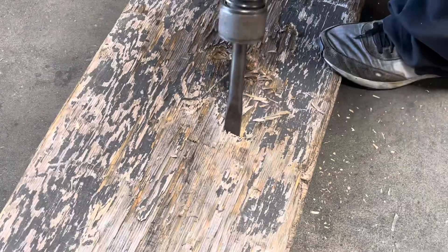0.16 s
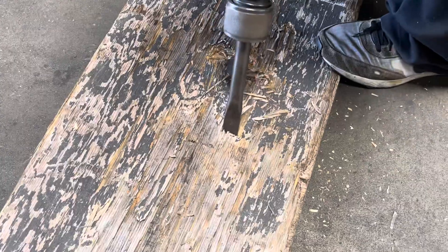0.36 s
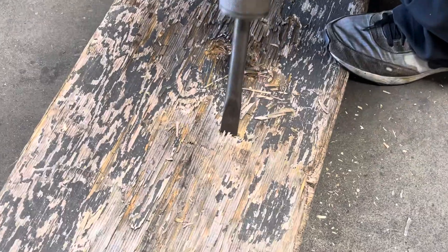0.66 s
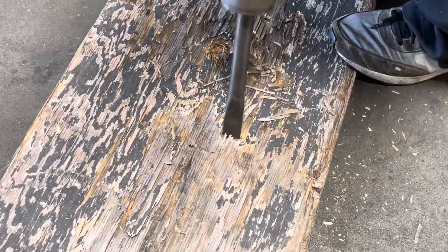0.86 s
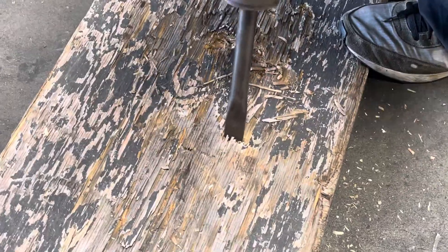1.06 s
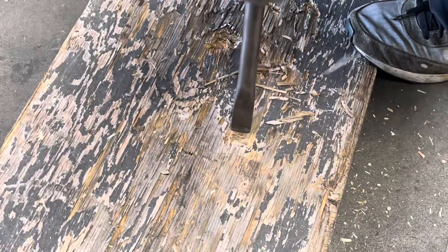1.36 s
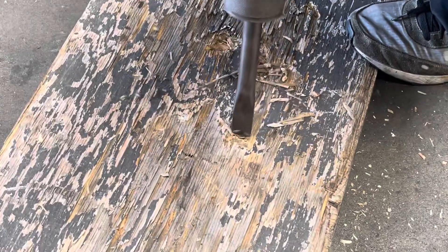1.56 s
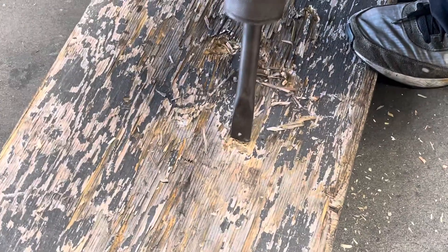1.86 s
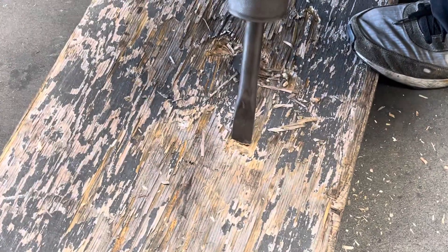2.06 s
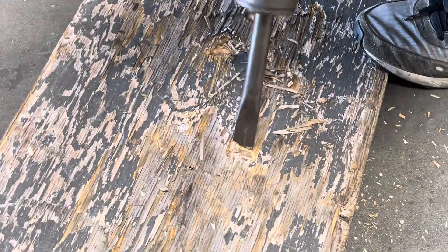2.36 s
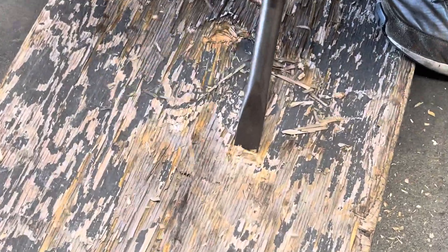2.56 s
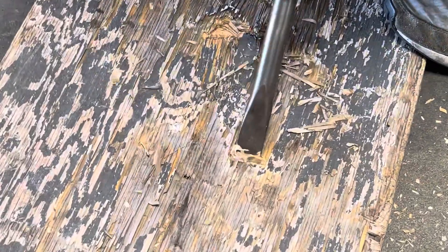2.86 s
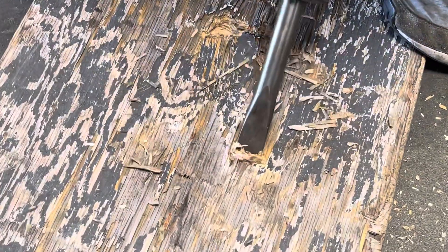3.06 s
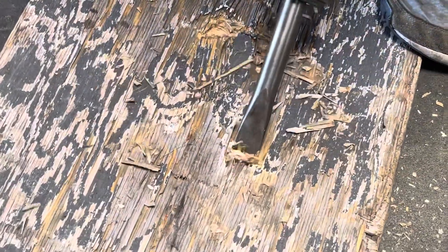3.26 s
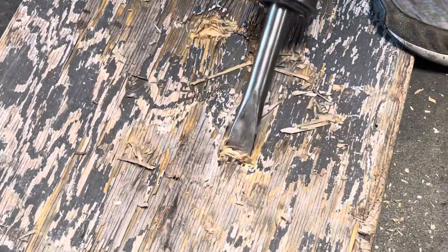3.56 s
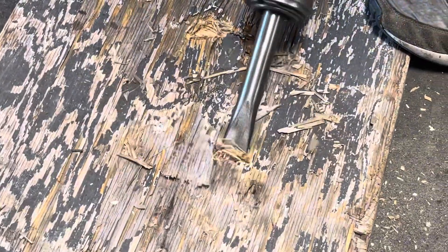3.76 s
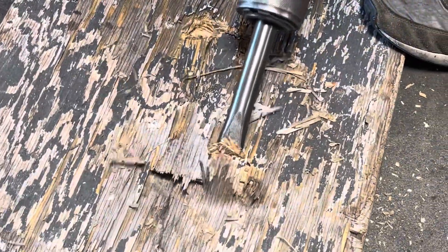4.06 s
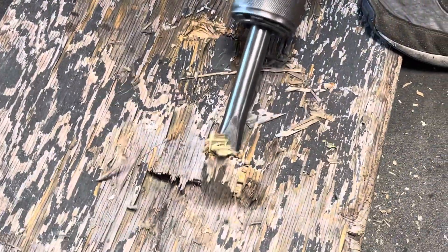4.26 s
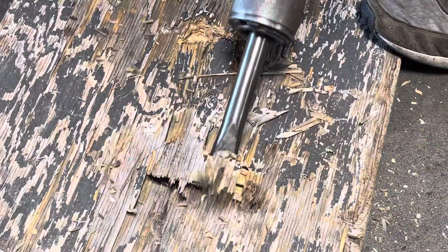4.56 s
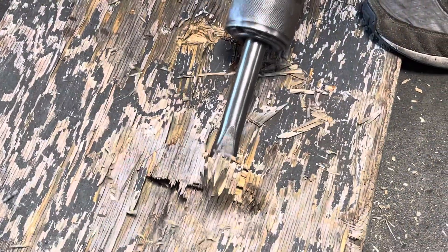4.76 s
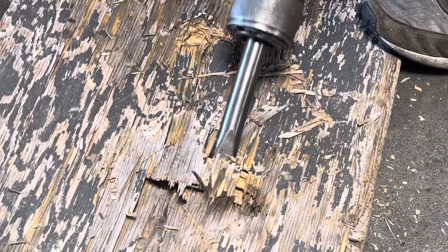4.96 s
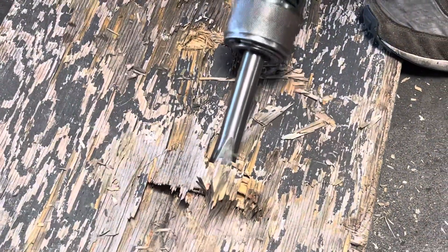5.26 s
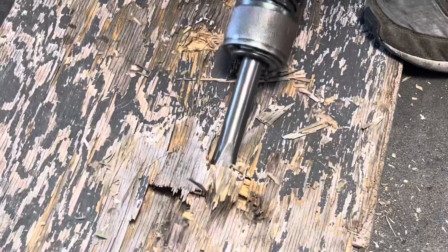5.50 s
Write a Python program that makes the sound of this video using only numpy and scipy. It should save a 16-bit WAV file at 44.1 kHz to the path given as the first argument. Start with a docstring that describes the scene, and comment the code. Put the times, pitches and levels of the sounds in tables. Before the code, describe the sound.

A pneumatic hammer hammers a steel chisel into a thick wooden board for about 5.6 seconds, close and dry in a workshop. Some 22 blows a second, slightly irregular, fuse into a hard buzzing rattle, yet each stroke remains distinct: a faint swell, bright steel snap, woody crack, knock around 500 to 650 hertz dipping in pitch, and short thud with a brief board tail of under a tenth of a second. The first blow is weak. Around 0.5 seconds the bit bounces free, rattling and ringing with a few weakened strokes; sharp, clanky blows stand out near 1.0. From 1.5 the knocks are fuller, with mixed bright and glancing hits. Past 3.5 to 3.9 the edge sinks in and the wood sounds deeper and more splintery. Another loose metallic rattle comes near 5.2, then hammering continues to the end. Quiet patchy air hiss lies underneath; the image is nearly central.

```python
"""In a workshop, a pneumatic hammer drives a steel chisel into a thick wooden board, some 22 blows a second.
Each blow sums filtered impulses and noise puffs: a steel snap, a crack of the edge, a knock of the board's
modes that sinks in pitch by dispersion, a thud and an after-sound; a faint noise swells into it. The bit rings
on as shaped noise when it bounces free, and rattles in its retainer. Steady noise in patches is the air and
the workshop, heard close by at two microphone ports."""
import sys
import numpy as np
from scipy import signal
from scipy.fft import rfft, irfft, next_fast_len
from scipy.io import wavfile
from scipy.ndimage import uniform_filter1d, minimum_filter1d

SR = 44100
rng = np.random.default_rng(int(sys.argv[2]) if len(sys.argv) > 2 else 0)


def waveform_to_disk(signal):
    """Save audio, clipped to [-1, 1], as 16-bit WAV at the path in sys.argv[1]."""
    frames = np.transpose(np.atleast_2d(signal))
    scaled = np.clip(frames, -1, 1) * 32767
    samples = np.round(scaled).astype(np.int16)
    wavfile.write(sys.argv[1], SR, samples)


N = 248283

# one blow is a row of SIZE samples, struck at sample ZERO
SIZE, ZERO = 4096, 1024
T = (np.arange(SIZE) - ZERO) / SR  # seconds from the strike
IMPULSE = (T == 0) * 1.0


def hammer():
    """Superposition: the blows add up in time, and a stray copy is smeared over many short unlike paths."""
    moments = blow_times()
    rows = blows(moments)
    paths = unit(burst(0., 0.00049)) * np.sqrt(SIZE)
    paths_from_zero = np.roll(paths, -ZERO, axis=1)
    stray_rows = irfft(rfft(rows) * rfft(paths_from_zero) / np.sqrt(SIZE), SIZE)
    out = np.zeros((2, N + 2 * SIZE))
    for moment, row, stray in zip(moments, rows, stray_rows):
        first = round(moment * SR)
        out[:, first:first + SIZE] += [row, stray]
    return out[:, ZERO:ZERO + N]


# pace of the piston, blows falling evenly between marks: start_s [s], blows_so_far [count]
PACE = [(0.0212, 0), (0.2475, 5), (0.4303, 9), (0.525, 11), (0.5775, 12), (0.7729, 16), (0.8234, 17),
        (1.0187, 21), (1.0696, 22), (1.1166, 23), (1.3113, 27), (1.4148, 29), (1.4625, 30), (1.5977, 33),
        (2.5951, 55), (3.3686, 72), (3.5522, 76), (3.5969, 77), (3.9623, 85), (4.1987, 90), (4.4317, 95),
        (4.6135, 99), (5.0257, 108), (5.21, 112), (5.2533, 113), (5.6202, 121)]
COUNT = int(PACE[-1][1]) + 1
JITTER_S = .0002


def blow_times():
    """Near-periodic excitation: the moments follow the pace with a small random jitter."""
    start_s, struck = np.transpose(PACE)
    return np.interp(np.arange(COUNT), struck, start_s) + JITTER_S * rng.standard_normal(COUNT)


# how the board answers as the edge digs in, usual values:
# start_s [s], knock_db [dB], knock_hz [Hz], upper_knock_db [dB], thud_db [dB], after_sound_db [dB]
BITE = [(0, -18, 543, -11, -31, -37), (.43, -20.5, 510, -13, -26.5, -40),
        (.56, -32.5, 583, -23, -36.5, -44), (.9, -26.5, 646, -27, -38, -39),
        (1.36, -32, 620, -13.5, -34.5, -36), (1.5, -11.5, 547, -23, -30, -31),
        (1.6, -22, 556, -16, -31, -27.5), (1.95, -17.5, 593, -10, -30.5, -27),
        (2.2, -18, 538, -11.5, -31.5, -34), (2.6, -19, 580, -8.5, -31.5, -30.5),
        (2.75, -15.5, 587, -8, -30.5, -39), (2.95, -22.5, 573, -36, -27, -31.5),
        (3.15, -17.5, 560, -10.5, -28.5, -43), (3.3, -19.5, 560, -24, -27.5, -36.5),
        (3.7, -18, 618, -18.5, -31, -34), (4.0, -21.5, 610, -24, -29.5, -32),
        (4.35, -27.5, 610, -27, -27, -31), (4.55, -21, 610, -10, -26, -33),
        (4.8, -28.5, 610, -29, -29.5, -31), (5.05, -18.5, 630, -22, -28.5, -34.5),
        (5.2, -17, 600, -30, -27.5, -33), (5.63, -15.5, 622, -16, -28, -32.5)]
# how loosely the bit sits in its retainer, usual values: start_s [s], shank_db [dB], bit_ring_db [dB]
PLAY = [(0, -19.5, -44), (.45, -21, -51), (.9, -20, -39), (1.3, -25, -42), (1.55, -23, -45),
        (2.0, -22.5, -48), (2.2, -14.5, -48), (2.5, -26, -38), (2.7, -22, -54), (2.9, -19, -41),
        (3.5, -11.5, -44), (3.65, -19, -49), (4.0, -19, -45), (4.3, -19, -40), (4.8, -19, -46),
        (5.0, -14.5, -46), (5.3, -18, -40), (5.63, -18.5, -44)]
# blows that stand out (glancing, bouncing free or biting deep); each row sets the blow nearest its time:
# start_s [s], crack_db [dB], snap_db [dB], shank_db [dB], knock_db [dB], upper_knock_db [dB], bit_ring_db [dB]
STANDOUT = [(0.02, -49, -54, -32, -18, -14.5, -52), (0.07, -11, -15.5, -15, -28, -9, -47),
            (0.48, -16.5, -35, -5, -27, -37, -33), (0.52, -38, -40, -14, -43, -27, -37.5),
            (0.58, -20, -28, -31, -32, -18, -49), (0.68, -27.5, -22.5, -18.5, -48, -40, -45),
            (0.97, -11, -13.5, -9, -33, -24, -46), (1.02, -10, -10.5, -7, -28, -39, -37),
            (1.07, -13, -20, -11, -46, -33, -38), (1.12, -26.5, -23.5, -23, -35, -26, -47),
            (1.36, -19, -25, -24.5, -30, -15, -37), (1.46, -12, -12.5, -21, -22, -10, -45),
            (1.55, -19, -23, -26, -13.5, -7.5, -50), (1.6, -19, -19.5, -18, -12, -8, -48),
            (1.78, -17, -21.5, -23.5, -13, -10, -41), (1.87, -17, -20, -22.5, -15.5, -9.5, -53),
            (2.01, -15.5, -13.5, -14.5, -19, -34, -40), (2.05, -18.5, -19, -49, -20, -12.5, -47),
            (2.6, -15, -19.5, -19.5, -29, -18, -57), (2.64, -16, -20, -24, -23, -23, -48),
            (2.78, -13, -13, -10, -15, -8.5, -42), (2.87, -16.5, -17.5, -15, -22, -34, -39),
            (3.28, -18.5, -17.5, -22, -28, -18, -53), (3.41, -13.5, -17, -15, -25, -20, -41),
            (3.51, -14, -13, -15, -27, -10, -40), (3.55, -16, -17.5, -13, -15, -14, -50),
            (3.78, -12.5, -15.5, -28, -18, -14, -42), (4.15, -14, -16.5, -8.5, -22.5, -22, -37),
            (4.89, -17, -19, -18, -16.5, -23, -40), (4.98, -15.5, -15.5, -15, -21, -32, -45),
            (5.12, -13.5, -16, -13, -43, -15, -37), (5.16, -17, -18, -11.5, -12.5, -11.5, -38.5),
            (5.21, -23, -20, -20, -16, -41, -29.5), (5.48, -23.5, -24, -18, -16, -16, -63)]
# scale of the chance change from blow to blow: one entry per part [dB]
SCATTER_DB = dict(crack=2, snap=1.6, shank=3, knock=3, upper=4, thud=1.5, ring=6.5, after=2)
CRACK_DB, SNAP_DB = -15.5, -18.5  # of a usual blow
KNOCK_SCATTER_HZ = 20


def strengths(moments):
    """Variable excitation: the level of each part and the knock's pitch, as columns with one row a blow."""
    knock, knock_hz, upper, thud, after = curves(BITE, moments)
    shank, ring = curves(PLAY, moments)
    usual = dict(crack=CRACK_DB, snap=SNAP_DB, shank=shank, knock=knock,
                 upper=upper, thud=thud, ring=ring, after=after)
    luck = np.clip(rng.standard_normal((len(usual) + 1, COUNT)), -2.5, 1.5)
    db = {part: usual[part] + SCATTER_DB[part] * dice for part, dice in zip(usual, luck)}
    # a usual blow leaves the bit seated
    db["ring"] = np.minimum(db["ring"], -38)
    for start_s, *levels in STANDOUT:
        k = np.argmin(np.abs(moments - start_s))
        # a weak crack leaves a weak thud and after-sound
        for part in "thud", "after":
            db[part][k] += 0.18 * np.clip(levels[0] - CRACK_DB, -12, 0)
        for part, level in zip(("crack", "snap", "shank", "knock", "upper", "ring"), levels):
            db[part][k] = level
    columns = {part: level[:, None] for part, level in db.items()}
    return columns, (knock_hz + KNOCK_SCATTER_HZ * luck[-1])[:, None]


def blows(moments):
    """Linear sum of steel, wood, ring, after-sound and swell: one row of sound for each blow."""
    db, knock_hz = strengths(moments)
    depth = np.clip(curves(DEPTH, moments)[0], 0, 1)[:, None]
    body = modes([(knock_hz, 190, 0)])
    upper = upper_modes()
    struck = steel(db) + wood(db, body, upper, depth)
    return struck + bit_ring(db) + after_sound(db, body, upper, depth) + swell(db)


# piston on bit, relative spectrum: pitch_hz [Hz], level_db [dB]
SNAP = [(3500, -54), (4300, -6.5), (5200, 2), (6800, 2.5), (8000, -2.5), (11000, -17.5), (13800, -25),
        (15500, -36), (16300, -53), (16900, -60)]
# lengthwise ring of the shank, before squaring: pitch_hz [Hz], width_hz [Hz], level_db [dB]
SHANK = [(9216, 1580, -1.5)]


def steel(db):
    """Impact and longitudinal resonance: noise puffs as the piston meets the bit just before the strike."""
    snap = part(db["snap"] + 19.5, burst(-0.00029, 0.00046), colour(SNAP))
    ring = part(db["shank"] + 20.5, burst(-0.00089, 0.00029), lambda f: modes(SHANK)(f) ** 2)
    return snap + ring


# high modes of the board, before chance: pitch_hz [Hz], width_hz [Hz], level_db [dB]
UPPER = [(1147, 203, 5), (1454, 263, 4), (1660, 270, 1.5), (2026, 420, -2), (2430, 140, -7.5),
         (2910, 230, -5.5)]


def upper_modes():
    """Modal excitation: every blow meets the grain anew and wakes the high modes at new strengths."""
    luck_db = 1.6 * rng.standard_normal((COUNT, len(UPPER)))
    return modes([(hz, width, db + luck_db[:, [k]]) for k, (hz, width, db) in enumerate(UPPER)])


def bend(f):
    """Dispersion of bending waves: the lower the frequency, the later it arrives."""
    return np.exp(-2j * np.pi * (1.2 * np.log(f + 12) - .00048 * f))


# how far the edge has sunk in: start_s [s], depth [share 0-1]
DEPTH = [(0, 0), (2.0, 0.03), (3.3, 0.1), (3.9, 0.86), (5.63, 1)]
# colour of the wood at full depth: pitch_hz [Hz], level_db [dB]
SUNK = [(150, -1), (215, 2.1), (320, -3.5), (450, -1.5), (620, 0.5), (900, -5.5), (1150, -0.5), (1400, -1)]


def sunken(depth):
    """Loading of the wood: its colour shifts in dB in proportion to the depth of the edge."""
    return lambda f: amp(depth * along(SUNK, f))


# edge on wood, relative spectrum: pitch_hz [Hz], level_db [dB]
CRACK = [(300, -13), (900, -7.5), (1300, -1.5), (2000, -1.5), (2900, 0), (3500, -6), (4200, -14.5),
         (5000, -45)]
# low modes of the board, before squaring: pitch_hz [Hz], width_hz [Hz], level_db [dB]
BOARD = [(550, 52, -6.5), (715, 190, -4)]
# board on the floor, relative spectrum: pitch_hz [Hz], level_db [dB]
THUD = [(25, -90), (55, -15.5), (110, -1), (150, 0), (200, -1), (250, 5), (320, -15), (450, -31)]
# air under the board, ringing on, before squaring: pitch_hz [Hz], width_hz [Hz], level_db [dB]
HOLLOW = [(204.2, 28.4, 2), (222.7, 77, -0.5), (422, 123, -1.5)]
# split wood, ringing on: pitch_hz [Hz], width_hz [Hz], level_db [dB]
SPLIT = [(1157, 18, 0)]


def wood(db, body, upper, depth):
    """Impulse response of the board: crack, knock, thud, hollow and split are struck at once."""
    def knock_response(f):
        return bend(f) * (np.abs(body(f)) * body(f) + modes(BOARD)(f) ** 2)

    def hollow_response(f):
        return bend(f) * np.abs(modes(HOLLOW)(f)) * modes(HOLLOW)(f)

    edge = IMPULSE + np.diff(0.34 * burst(0., 0.000078), prepend=0)
    fibres = IMPULSE + 0.16 * burst(0.00072, 0.0011)
    out = part(db["crack"] + 20.5, edge, lambda f: bend(f) * colour(CRACK)(f))
    out += part(db["knock"] + 19, IMPULSE, knock_response)
    out += part(db["upper"] + 11.0, fibres, lambda f: upper(f) ** 2)
    out += part(db["thud"] + 21.5, IMPULSE, lambda f: bend(f) * colour(THUD)(f))
    out += part(db["thud"] + 18.5, IMPULSE, hollow_response)
    # the split sounds more with depth
    out += depth * part(db["after"] + 17.5, IMPULSE, modes(SPLIT))
    return filtered(out, sunken(depth))


# modes of the bit: pitch_hz [Hz], width_hz [Hz], level_db [dB]
STEEL = [(3000, 690, -6), (3460, 1370, -8), (5410, 690, -7), (7000, 1340, -9), (7820, 75, 1.5),
         (9500, 87, -26), (11000, 290, -10), (14900, 500, -17)]
# treble lost on the way: pitch_hz [Hz], level_db [dB]
DULL = [(9000, -0.5), (12000, 1.5), (13500, -37), (15000, -4), (17000, -30)]


def bit_modes(f):
    """Modal response of the bit, dulled by transmission loss on the way."""
    return modes(STEEL)(f) * colour(DULL)(f)


# damping of the highest modes by wood around a seated edge: pitch_hz [Hz], level_db [dB]
SEATED = [(9800, -4.5), (11000, -10), (13500, -25)]


def seated_bit(db):
    """Boundary damping: how free each bit is (0-1), and its response, whose treble a seated edge damps."""
    free = np.clip((db["ring"] + 37) / 8, 0, 1)
    return free, lambda f: bit_modes(f) * amp((1 - free) * along(SEATED, f))


# modes that open up when the edge leaves the wood: pitch_hz [Hz], width_hz [Hz], level_db [dB]
LOOSE = [(5000, 570, -14), (9500, 180, 2.5)]


def bit_ring(db):
    """Free decay: a bit that bounces free rings louder and longer, chattering, until it is seated again."""
    free, bit = seated_bit(db)
    wobble = unit(uniform_filter1d(rng.standard_normal((COUNT, SIZE)), 90)) * np.sqrt(SIZE)
    chatter = amp(3.6 * wobble * free)
    t60_s = 0.045 + 3.0 * free
    seated = 1 - ramp(.044)  # the ring is cut 44 ms after the strike
    level = amp(db["ring"] - 60 * (T - .0075) / t60_s) * ramp(-0.0023) * seated * chatter
    return level * noise(lambda f: bit(f) + free * modes(LOOSE)(f))


# board and near walls sounding on, also tints the swell: pitch_hz [Hz], level_db [dB]
AFTER = [(60, -39), (200, -7), (340, 13), (450, 1), (620, 9.5), (800, 11.5), (950, -1.5), (1150, 4),
         (1330, -9), (1700, -0.5), (2800, -4.5), (3500, -23.5), (4300, -63), (6000, -76)]


def after_sound(db, body, upper, depth):
    """Reverberation: the board and the near walls sound on after the knock as decaying noise."""
    def response(f):
        board = np.abs(body(f)) ** 2 + amp(-4.5) * np.abs(upper(f)) ** 2
        return sunken(depth)(f) * colour(AFTER)(f) + board

    level = amp(db["after"] + 0.5 - 60 * (T - .0075) / 0.073)  # 60 dB in 73 ms
    return level * np.clip(T / 0.0035, 0, 1) * noise(response)


def swell(db):
    """Exponential envelope: a faint noise swelling into each blow."""
    bit = seated_bit(db)[1]
    level = amp(db["crack"] - 12 + 60 * np.minimum(T, 0) / 0.036) * (1 - ramp(0.))
    return level * noise(lambda f: colour(AFTER)(f) * f / 1400 + bit(f))


# the loose bit rattling in its retainer, relative levels: start_s [s], level_db [dB], t60_s [s]
RATTLES = [(0.475, -2.5, 0.026), (.487, -27, .03), (.5175, -26, .02), (.5228, -16, 0.11),
           (0.57, -18.5, 0.032), (.818, -29, .02), (0.967, -26, .02), (1.016, -11, 0.01),
           (1.357, -15, 0.017), (1.409, -16.5, 0.039), (2.001, -15.5, 0.018), (2.772, -14, 0.02),
           (2.817, -11.5, 0.026), (3.683, -18, 0.016), (5.2073, -12, 0.04), (5.21, -25, .06),
           (5.221, -30, .03), (5.246, -14.5, 0.031)]


def rattles():
    """Repeated impact: decaying bursts of noise through the modes of the bit."""
    def bit(f):
        loose = amp(7) * modes(LOOSE)(f)
        shank = amp(-0.5) * modes(SHANK)(f)
        return (modes(STEEL)(f) + loose + shank) * colour(DULL)(f)

    envelope, t = np.zeros(N), np.arange(SIZE // 2) / SR
    for start_s, level_db, t60_s in RATTLES:
        attack = np.clip(t / 0.00079, 0, 1)
        envelope[round(start_s * SR):][:len(t)] += amp(level_db - 60 * t / t60_s) * attack
    return envelope * np.sqrt(N) * unit(filtered(rng.standard_normal(N), bit))


# exhaust and workshop noise, relative spectrum: pitch_hz [Hz], level_db [dB]
AIR = [(30, -39), (70, 7), (200, 1.5), (430, 5), (950, -3.5), (1150, -1), (1400, -6), (2800, -13.5),
       (4300, -23), (6500, -20.5), (8500, -21), (9400, -25.5), (11000, -68), (12500, -70)]
# air between blows, relative level over time: start_s [s], level_db [dB]
HISS = [(0.0, -38.5), (0.3, -34.5), (0.58, -46), (0.75, -43), (0.88, -44), (1.3, -44), (1.57, -34.5),
        (1.71, -40.5), (1.98, -38.5), (2.22, -38.5), (2.77, -38.5), (3.28, -37), (3.43, -40), (4.61, -43),
        (5.27, -39.5), (5.63, -41.5)]


def air():
    """Turbulence noise: exhaust and workshop noise, in patches that deepen towards the treble."""
    spectra = signal.stft(rng.standard_normal((2, N)), nperseg=256)[2]
    patches = uniform_filter1d(rng.standard_normal(spectra.shape[1:]), size=5, axis=0)
    patches = uniform_filter1d(patches, size=6, axis=1)
    patch_depth_db = np.linspace(2.5, 14, len(patches))[:, None]
    patchy = spectra * amp(patch_depth_db * patches / patches.std())
    pair = signal.istft(patchy, nperseg=256)[1][:, :N]
    level = amp(curves(HISS, np.arange(N) / SR)[0] - 2.5)
    # the stray part is given 5 dB more
    return level * np.sqrt(N) * unit(filtered(pair, colour(AIR))) * amp([[0], [5]])


def amp(db):
    """Logarithmic level: the gain of a level in dB."""
    return 10 ** (np.asarray(db) / 20)


def unit(x):
    """Energy normalisation: energy 1 along the last axis."""
    return x / np.sqrt(np.sum(x ** 2, axis=-1, keepdims=True) + 1e-20)


def along(points, hz):
    """Logarithmic pitch: interpolates (pitch_hz, value) points on a log axis."""
    f, v = np.transpose(points)
    return np.interp(np.log(hz + 1), np.log(f + 1), v)


def curves(rows, s):
    """Linear interpolation in time: the columns of a table at times s."""
    t, *columns = np.transpose(rows)
    return [np.interp(s, t, column) for column in columns]


def modes(table):
    """Modal sum: second-order resonances with alternating sign."""
    def resonance(f, hz, width, db):
        return amp(db) * 1j * f * width / (hz * hz - f * f + 1j * f * width + 1e-9)

    return lambda f: sum((-1) ** k * resonance(f, *mode) for k, mode in enumerate(table))


def colour(points):
    """Spectral envelope: the response of a (pitch_hz, level_db) spectrum."""
    return lambda f: amp(along(points, f))


def filtered(x, response):
    """Linear filtering: multiplies the spectrum of x by a complex response of frequency."""
    n = x.shape[-1]
    m = next_fast_len(n)
    return irfft(rfft(x, m) * response(np.fft.rfftfreq(m, 1 / SR)), m)[..., :n]


def part(db, x, response):
    """Energy scaling: a filtered part gets energy 1; the dB added to its level stands for its length."""
    return amp(db) * unit(filtered(x, response))


def burst(at_s, width_s):
    """Gaussian window: one short puff of noise for each blow."""
    return rng.standard_normal((COUNT, SIZE)) * np.exp(-((T - at_s) / width_s) ** 2)


def noise(response):
    """Stationary noise: a filtered row of mean power 1 for each blow."""
    return np.sqrt(SIZE) * unit(filtered(rng.standard_normal((COUNT, SIZE)), response))


def ramp(start_s):
    """Linear onset: rises from 0 to 1 in 0.89 ms."""
    return np.clip((T - start_s) / 0.00089, 0, 1)


# phase between the two microphone ports: pitch_hz [Hz], left_lead [rad]
LEAD = [(0, 0), (520, 0.2), (1720, -0.2), (3100, 0.6), (6800, 0.0), (7750, 0.5), (8350, 0.5), (9390, -1.7),
        (12400, -6.9), (13300, -8.9), (14300, -10.0), (15200, -12.6), (16100, -12.9), (16700, -12.5)]
# part unrelated between the ports: pitch_hz [Hz], level_db [dB]
UNLIKE = [(30, -13), (90, -12), (200, -18), (1000, -12.5), (3500, -16), (8000, -13), (14000, -18.5)]


def scene():
    """Phase and coherence between two ports: all sources reach both, alike but for a stray part."""
    rattle = np.array([rattles(), rattles()])
    shared, stray = hammer() + air() + rattle
    stray = filtered(stray, colour(UNLIKE))
    ports = np.array([shared + stray, shared - stray])
    return filtered(ports, lambda f: np.exp(.5j * along(LEAD, f) * [[1], [-1]]))


# fall of the treble towards the band limit: pitch_hz [Hz], level_db [dB]
EDGE = [(15800, 1), (16500, -10), (16750, -28)]
TOP_HZ = 16900


def record(dry):
    """Gain limiting and band limiting: a fast limiter holds the peaks, then the treble falls away."""
    need = np.minimum(1, .82 / (np.abs(dry).max(axis=0) + 1e-9))
    gain = uniform_filter1d(minimum_filter1d(need, size=41), size=33)
    return filtered(dry * gain, lambda f: colour(EDGE)(f) * (f < TOP_HZ))


dry = scene()
out = record(dry)
waveform_to_disk(out)
```